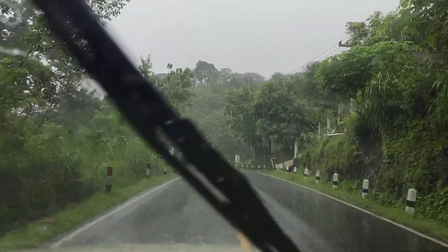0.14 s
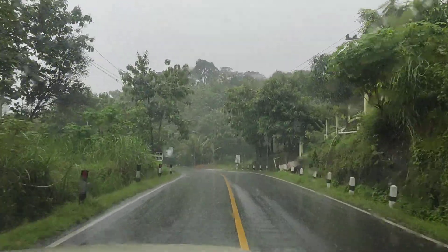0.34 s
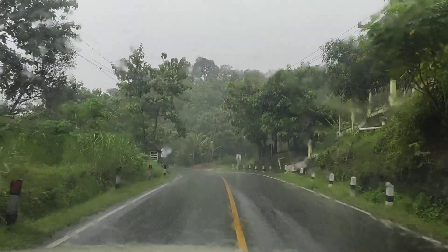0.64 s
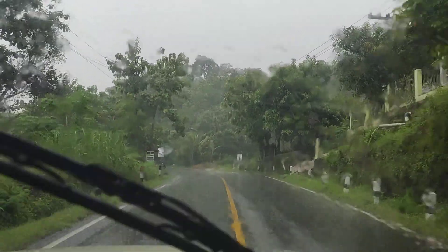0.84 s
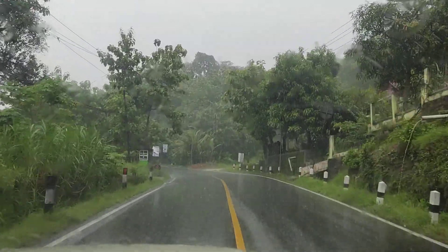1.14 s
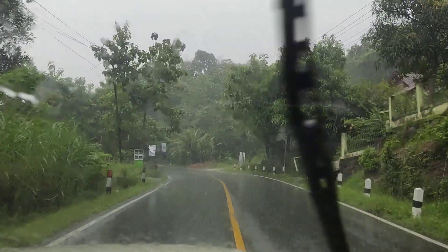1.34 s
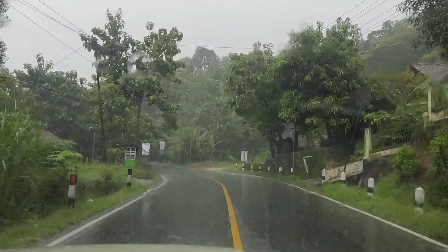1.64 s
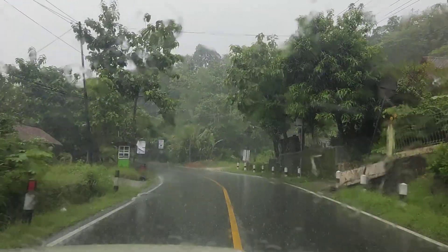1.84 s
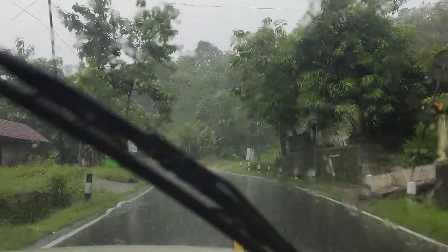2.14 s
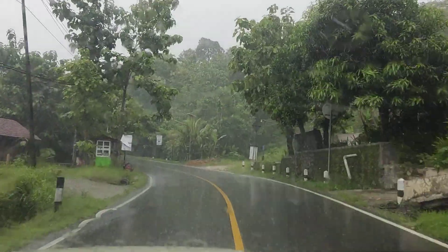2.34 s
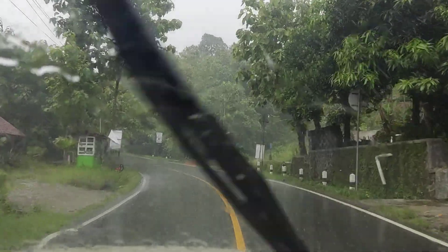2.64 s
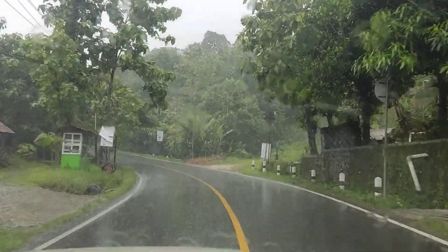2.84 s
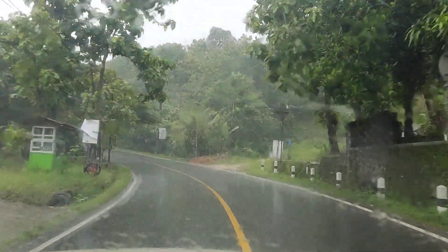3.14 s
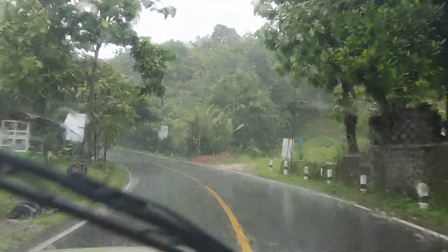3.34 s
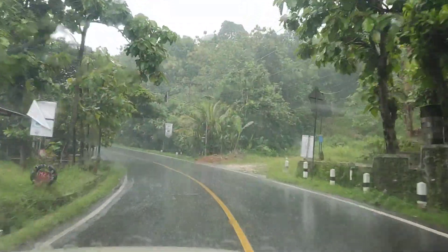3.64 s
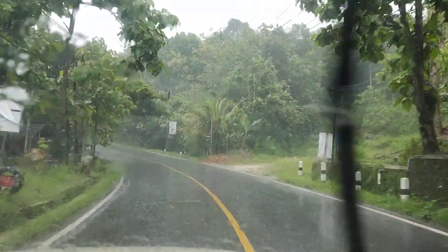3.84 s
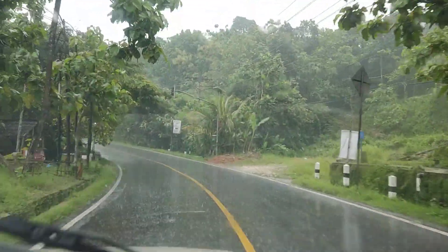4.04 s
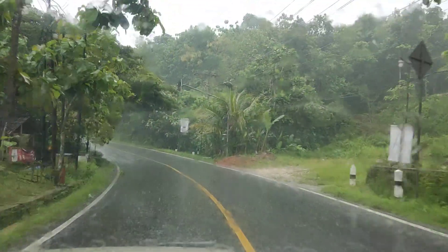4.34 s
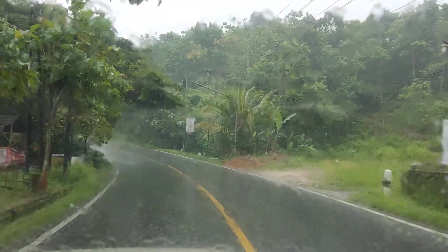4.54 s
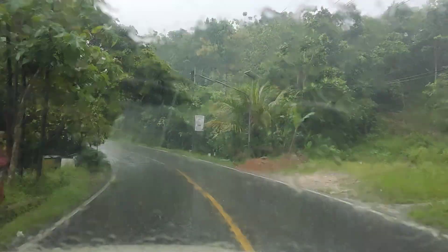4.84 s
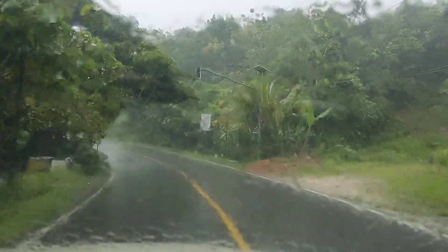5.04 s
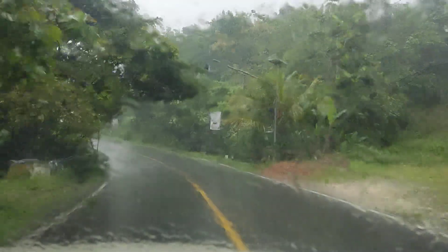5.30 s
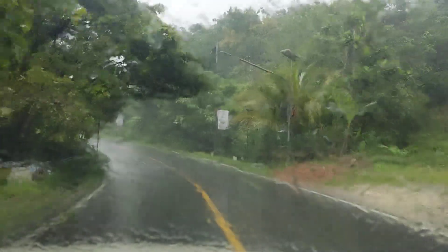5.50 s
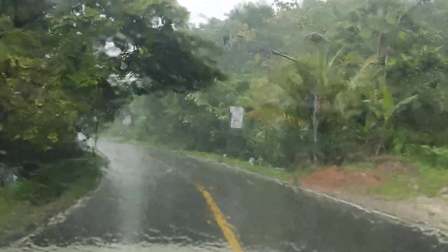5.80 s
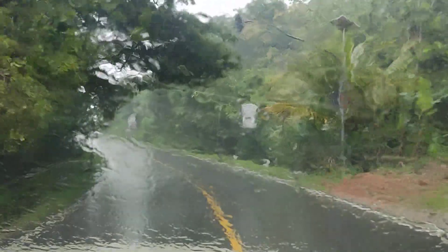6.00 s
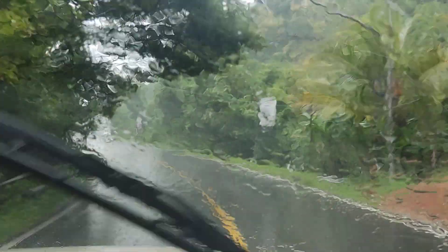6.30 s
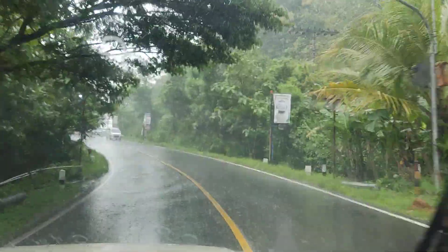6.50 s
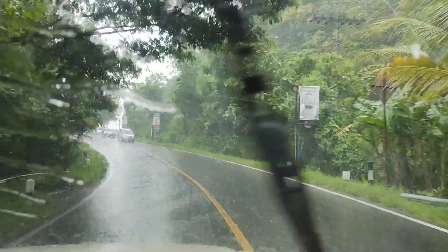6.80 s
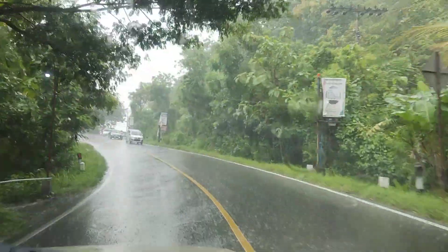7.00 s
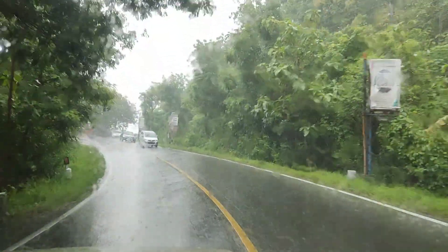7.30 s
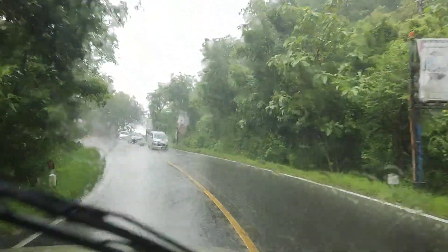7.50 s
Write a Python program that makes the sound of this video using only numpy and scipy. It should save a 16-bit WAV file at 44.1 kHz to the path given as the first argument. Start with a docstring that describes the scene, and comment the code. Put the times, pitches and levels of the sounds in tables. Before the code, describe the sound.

Inside a car driving through a downpour, drops smack the glass and roof while wet tyres hiss and the cabin rumbles.

```python
"""Heavy rain patters on the windscreen and drums on the lined roof of a moving car, heard from inside.
Each drop is a brief impact, coloured by the surface it strikes: bright on glass, dull through the lining.
Fat drops smack the glass, in flurries under the trees; drips knock on the roof and the wipers swish.
Below them the road drives the body into a boom, the wet tyres sizzle, the wheels throb
and the engine hums, speeding up a little at the end."""
import sys
import numpy as np
from scipy import signal
from scipy.fft import rfft, irfft, next_fast_len
from scipy.io import wavfile
from scipy.ndimage import uniform_filter1d, minimum_filter1d, map_coordinates

SR = 44100
rng = np.random.default_rng(int(sys.argv[2]) if len(sys.argv) > 2 else 0)


def inscribe(sig):
    """Save sig as 16-bit PCM at rate SR to the path in sys.argv[1].

    A 1-D sig is mono; a 2-D sig holds one channel per row.
    Samples are clipped to [-1, 1] before scaling.
    """
    pcm = np.round(np.clip(np.atleast_2d(sig).T, -1, 1) * 32767)
    wavfile.write(sys.argv[1], SR, pcm.astype(np.int16))


N = 337615
TIME = np.arange(N) / SR

# Roughness of the road. Each row: time in seconds, level of the boom in dB.
ROAD_ROUGHNESS = [(0, -16.5), (1.2, -15), (2, -16.5), (2.6, -17.5), (3.3, -16), (3.9, -17), (4.6, -16),
                  (5.5, -14.5), (6.5, -17), (7.66, -15)]
# Brief swells and dips of the low rumble. Each row: middle in seconds, change in dB.
RUMBLE_SWELLS = [(.43, -3), (.7, -5.5), (1.3, -4), (1.59, 3), (1.72, -2.5), (1.88, 3), (1.96, -6),
                 (2.4, -3), (2.53, -0.5), (2.67, -7), (2.81, 3), (3.31, -9), (3.41, -12), (3.72, -1.5),
                 (3.9, 5.5), (4.1, 4), (4.42, -4), (4.85, -9), (5.2, 1), (5.57, -4), (5.86, -4.5),
                 (6.31, -1), (7.55, 3.5)]
# Boom of the car body. Each row: frequency in Hz, relative level in dB.
BOOM_SPECTRUM = [(5, -34), (20, -7.5), (31, 0), (45, 3), (58, -2), (67, -20), (85, -12.5), (130, -13),
                 (155, -18.5), (182, -18), (215, -21), (255, -37), (400, -44), (900, -90)]
# Running of the engine. Each row: time in seconds, firing rate in Hz, load in dB.
ENGINE_STATE = [(0, 57.83, 1), (2, 57.96, 0.5), (3.3, 56.96, 0), (4.3, 58.11, -2), (5.5, 57.96, -5.5),
                (6.5, 58.6, 0), (7.1, 60.12, 2), (7.66, 60.9, 6)]
# Hum of the engine. Each row: multiple of the firing rate, level in dB, dB gained per dB of load.
ENGINE_ORDERS = [(1, -26, .3), (2, -30.7, .2), (3, -36, 1.25)]
# Wheels and gears. Each row: multiple of the firing rate, level in dB, dB gained per dB of load.
WHEEL_ORDERS = [(.353, -16, 0), (.706, -20, 0), (1.63, -34, 0.2), (3.66, -44.5, 0), (5.57, -46, 1.15)]
# Tyres and distant rain. Each row: frequency in Hz, relative level in dB.
WASH_SPECTRUM = [(100, -24), (250, -1), (330, -2.5), (600, -6), (850, -12), (1600, -8), (2400, -14.5),
                 (4000, -12.5), (7000, -19), (11000, -18.5), (14500, -25.5)]
# Upstrokes of the wipers. Each row: middle in seconds, level in dB.
WIPER_STROKES = [(.9, -41.5), (2.17, -44), (3.42, -48), (6.48, -46.5)]
# Strength of the rain. Each row: time in seconds, relative level in dB.
RAIN_STRENGTH = [(0.0, -34.5), (0.23, -37.5), (1.85, -36), (2.77, -37), (3.25, -39), (3.79, -37.5),
                 (4.71, -38), (5.2, -36), (5.54, -38.5), (6.54, -38), (7.16, -36.5), (7.31, -37),
                 (7.66, -36.5)]
# Modes of the roof panel and cabin. Each row: frequency in Hz, width in Hz, gain in dB.
PANEL_MODES = [(280.7, 5.4, 5.5), (332, 5.6, 0.5), (470, 21, 2), (550, 21, 0.5), (621, 32, 4.5),
               (1010, 52, 7), (1400, 80, 2.5)]
# Drops heard through the roof lining. Each row: frequency in Hz, gain in dB.
ROOF_RESPONSE = [(80, -32), (200, -6), (350, 6), (550, 1.5), (850, -21), (1500, -8), (2500, -14.5),
                 (5000, -54), (12000, -65)]
# Gusts that throw water on the roof. Each row: middle in seconds, swell in dB.
ROOF_GUSTS = [(.03, 5), (.56, 4), (1.84, 3), (2.52, 1.5), (3.1, 4.5), (3.69, 0.5), (4.36, 2.5), (5.39, 2),
              (7.3, 7.5), (7.59, 3.5)]
# Showers shed by branches. Each row: middle in seconds, half length in seconds, level in dB.
BRANCH_SHOWERS = [(5.249, 0.015, -31.5), (5.398, 0.051, -34.5), (5.89, 0.024, -34), (7.183, 0.031, -30.5),
                  (7.33, 0.024, -31.5), (7.601, 0.068, -31.5)]
# Colour of those showers. Each row: frequency in Hz, gain in dB.
SHOWER_RESPONSE = [(150, -10), (450, -4), (1300, 4.5), (2600, 0), (4500, -2.5), (8000, -13), (14000, -32)]
# Heavy drips on the roof. Each row: start in seconds, relative level in dB, main mode in Hz,
# its width in Hz, upper mode against main in dB, thud against ring in dB.
ROOF_DRIPS = [(4.2, -16.5, 1290, 130, -13, -6), (5.242, -18.5, 2000, 900, -1, -8),
              (5.3462, -13.5, 2600, 450, -3, -5), (5.351, -20, 1450, 700, -3, -3),
              (5.398, -16, 500, 280, -10, -7), (7.146, -20, 680, 350, -4, -4),
              (7.2575, -13.5, 2450, 800, -1, -11), (7.31, -16, 560, 600, -3, -4),
              (7.327, -20, 700, 600, -3, -3), (7.347, -22, 3000, 600, -2, -2),
              (7.3725, -20.5, 3500, 1200, 1, -8), (7.608, -21, 3000, 1000, -3, -3),
              (7.625, -21, 1700, 1200, -1, -3)]
# Drops heard through the glass. Each row: frequency in Hz, gain in dB.
GLASS_RESPONSE = [(200, -11), (700, 4), (1400, -2.5), (2400, 0), (3800, 1.16), (6000, -0.7), (9000, -3.5),
                  (11500, -3), (13000, -9.5), (14500, -7)]
# Spray sweeping over the glass. Each row: middle in seconds, half length in seconds, swell in dB.
SPRAY_SHEETS = [(0.057, 0.044, 0.5), (0.278, 0.029, 5), (0.78, 0.035, 3), (0.97, 0.076, 1),
                (1.73, 0.029, 1.5)]
# Brief lulls in the patter on the glass. Each row: middle in seconds, dip in dB.
PATTER_LULLS = [(3.93, -3), (6.87, -4), (7.28, -3), (7.435, -7.5), (7.484, -4), (7.56, -3.5)]
# The fattest drops on the glass. Each row: start in seconds, relative level in dB, treble lift in dB,
# left against right in dB, spray against impact in dB.
FAT_DROPS = [(.4377, -23, 0, -3, -3), (.4447, -19, 5, 2, 2), (.484, -24, 2, 0, -2), (.537, -20.5, 0, 2, 4),
             (.7673, -23, 0, -2, 4), (.8347, -19, 6, 7, -1), (.9818, -27, -7, 4, -2),
             (1.0472, -19, 6, -6, 2), (1.649, -23, 2, 0, -2), (1.7022, -22, 3, -5, -2),
             (1.9772, -18.5, 10, -10, -5), (1.9849, -23.5, 4, -3, -3), (2.104, -17, 6, 3, 1),
             (2.3747, -23.5, 2, 0, -2), (2.5305, -16.5, 0, -5, 2), (2.5427, -20, 0, -2, -1),
             (2.6354, -25, -1, 0, -2), (3.2547, -25, 2, 0, -2), (3.2677, -22, 0, -3, 5),
             (3.3438, -25, 2, 3, -2), (3.39, -24.5, 2, -3, -2), (3.4167, -25, 2, 2, -2),
             (3.7383, -22.5, 5, 3, -1), (4.0738, -22, 4, -7, 5), (4.189, -21.5, 15, 4, 6),
             (4.1943, -17, 16, 5, 9), (4.252, -16.5, 3, 2, 1), (4.4228, -19.5, -9, -1, 2),
             (4.6467, -24.5, 2, 0, -2), (4.7111, -25, 7, -5, 4), (4.7499, -21, 0, -5, 0),
             (4.999, -22, 7, 3, -1), (5.2309, -22, -4, -8, 0), (5.349, -18.5, -8, -8, -1),
             (5.4918, -20.5, -3, -4, 2), (5.6412, -24.5, 0, 0, -2), (5.8074, -25, 2, 5, -3),
             (6.1053, -24, 2, -8, 0), (6.2301, -25, 2, 0, -2), (6.3312, -17.5, 0, -3, 3),
             (6.4483, -22, 1, 11, -4), (6.6216, -23, 3, -7, -3), (6.6357, -22, 0, 0, 0),
             (6.7297, -17, -6, 3, 3), (6.7397, -25, 0, -5, -3), (6.8215, -24.5, 2, 0, -2),
             (6.941, -22.5, 0, 5, 2), (6.9722, -22.5, 13, 10, -3), (7.0114, -21, -4, -5, -4),
             (7.0296, -24, 2, 0, -2), (7.2345, -12.5, -4, 0, 5), (7.3474, -19.5, 2, 2, -1),
             (7.3957, -24.5, 2, -3, -2), (7.4707, -16, -7, -5, 2), (7.497, -14.5, -8, -4, 2),
             (7.5125, -25, -3, -5, 2), (7.526, -17, -3, -5, 1), (7.5305, -15, -2, -3, 10),
             (7.5761, -24, -4, -4, 2), (7.597, -16.5, -2, -1, 9)]
# Burst of a fat drop on the glass. Each row: frequency in Hz, gain in dB.
BURST_RESPONSE = [(200, -20), (700, -2), (1400, -4), (2400, -3), (3800, 1.5), (6000, 3), (9000, 3),
                  (11500, 3), (13000, -4.5), (14500, -4)]
# Resonance of the microphone ports, left then right. Each row: frequency in Hz, width in Hz, gain in dB.
PORT_MODES = [(11460, 3700, 6), (9030, 1760, 11)]
# Broad response of the ports. Each row: frequency in Hz, left gain in dB, right gain in dB.
PORT_RESPONSE = [(60, 0.83, 2), (171, 2.4, 1), (322, 2.5, 1.35), (400, 1, -2), (747, 2, 1.5), (980, -2, -3),
                 (2800, -2.5, -2), (6000, -4.5, -2.5), (8670, -4.5, 1), (10700, 0, -6.5),
                 (14000, -5.5, -7.5)]


def amp(db):
    """Amplitude grows tenfold for every 20 dB."""
    return 10 ** (np.asarray(db) / 20)


def unit(x):
    """Normalisation to rms 1."""
    return x / np.sqrt(np.mean(x ** 2) + 1e-20)


def curve(rows):
    """Linear interpolation of each column of a time table, at every sample."""
    s, *columns = np.transpose(rows)
    return [np.interp(TIME, s, c) for c in columns]


def spectrum(rows, hz):
    """Interpolation of each column of a frequency table, on a logarithmic axis."""
    f, *columns = np.transpose(rows)
    return np.array([np.interp(np.log(hz + 1), np.log(f + 1), c) for c in columns])


def resonance_db(modes, hz):
    """Each resonance adds a bell-shaped curve to the response in dB."""
    return sum(db / (1 + (2 * (hz - f) / width) ** 2) for f, width, db in modes)


def colour(x, shape):
    """Filtering multiplies the spectrum by a response, here a function from Hz to dB."""
    size = next_fast_len(x.shape[-1])
    gain = amp(shape(np.fft.rfftfreq(size, 1 / SR)))
    return irfft(rfft(x, size) * gain, size)[..., :x.shape[-1]]


def resonate(x, hz, width_hz):
    """A damped mode rings the longer the narrower it is; the result has energy 1."""
    r = np.exp(-np.pi * width_hz / SR)
    ring = signal.lfilter([1, 0, -1], [1, -2 * r * np.cos(2 * np.pi * hz / SR), r * r], x)
    return ring / np.linalg.norm(ring)


def mingle(x, corner_hz=330):
    """Coherence falls with frequency: long waves reach both microphone ports alike, short ones differ."""
    return x + colour(x[::-1], lambda hz: -20 * np.log10(1 + (hz / corner_hz) ** 2))


def drift(per_s):
    """Slow random modulation of rms 1, a spline through random knots."""
    knots = rng.standard_normal(4096)
    return unit(map_coordinates(knots, [TIME[::64] * per_s], order=3, mode="wrap")).repeat(64)[:N]


def swell(s, half_s):
    """A Gaussian envelope of height 1; the half length is its standard deviation."""
    return np.exp(-.5 * ((TIME - s) / half_s) ** 2)


def add(mix, s, sound):
    """Superposition: a stereo sound adds to the mix from second s."""
    part = mix[:, max(round(s * SR), 0):][:, :sound.shape[1]]
    part += sound[:, :part.shape[1]]


def splash(spray_s, spray_db, cabin_db, cabin_t60=0.15):
    """A drop is three decaying transients: the impact, flung droplets, the cabin's reverberation."""
    t = np.arange(4096) / SR
    impact, spray, tail = rng.standard_normal((3, 2, len(t)))
    since_arrival = t - rng.integers(0, 24, (2, 1)) / SR  # the path to each port differs
    impact = impact * (since_arrival >= 0) * np.exp(-abs(since_arrival) / 0.00024)
    spray = spray * rng.exponential(1, spray.shape) * np.exp(-t / spray_s)
    tail = tail * amp(-60 * t / cabin_t60)
    return unit(unit(impact) + amp(spray_db) * unit(spray) + amp(cabin_db) * unit(tail)) / np.sqrt(len(t))


def patter(per_s, spread_db, spray_s, spray_db, cabin_db, tint_db, side_db, spots=20):
    """Shot noise: drops of random size and timing excite spots, each with its own colour and side."""
    out = np.zeros((2, N))
    sides = rng.permutation(np.linspace(-1, 1, spots))
    for side, ring_hz in zip(sides, np.geomspace(1000, 13000, spots)):
        sizes = amp(spread_db * np.minimum(rng.exponential(1, N), 4.5))
        hits = sizes * (rng.random(N) < per_s / spots / SR)
        drop = splash(spray_s, spray_db, cabin_db)
        drop = colour(drop, lambda hz: resonance_db([(ring_hz, 0.61 * ring_hz, tint_db)], hz))
        pan = amp([[side * side_db], [-side * side_db]])
        out += signal.oaconvolve(hits[None], unit(drop) * pan, axes=1)[:, :N]
    return unit(out)


def body_boom():
    """Forced vibration: the road shakes the cabin, and such long waves reach both ports nearly alike."""
    noise = rng.standard_normal(N) + 0.1 * rng.standard_normal((2, N))
    bumps_db = 0.2 * drift(per_s=9.9)
    boom = unit(colour(noise, lambda hz: spectrum(BOOM_SPECTRUM, hz)))
    return amp(curve(ROAD_ROUGHNESS)[0] + bumps_db) * boom


def drivetrain(orders, waver_db, wobble_turns, roughness):
    """Rotating parts sound at multiples of the firing rate, swell with load and shudder with the road."""
    firing_hz, load_db = curve(ENGINE_STATE)
    turns = np.cumsum(firing_hz) / SR
    out = np.zeros(N)
    for multiple, db, load_share in orders:
        phase = multiple * turns + rng.random() + wobble_turns * drift(per_s=4)
        shudder = unit(1 + roughness * drift(per_s=30))
        level = amp(db + load_share * load_db + waver_db * drift(per_s=5.5))
        out += np.sqrt(2) * level * shudder * np.sin(2 * np.pi * phase)
    return out


def wet_wash():
    """Broadband noise of wet tyres and distant rain, filtered by the modes of panel and cabin."""
    noise = mingle(rng.standard_normal((2, N)))
    sizzle = colour(noise, lambda hz: spectrum(WASH_SPECTRUM, hz) + resonance_db(PANEL_MODES, hz))
    rain_db = curve(RAIN_STRENGTH)[0]
    return amp(-35.5 + 0.25 * (rain_db - rain_db.mean()) + 0.27 * drift(per_s=5.1)) * unit(sizzle)


def wipers(centre_hz=3880, width_hz=1400):
    """Rubber blades push a film of water up the glass; the swish is noise through two resonators."""
    strokes = sum(amp(db) * swell(s, half_s=.12) for s, db in WIPER_STROKES)
    film = resonate(rng.standard_normal((2, N)), centre_hz, width_hz)
    return strokes * unit(resonate(film, centre_hz, width_hz))


def roof_drumming():
    """Impacts excite the panel's modes and the lining absorbs the treble; gusts swell the drumming."""
    drops = mingle(patter(per_s=700, spread_db=3, spray_s=0.007, spray_db=4,
                          cabin_db=0, tint_db=5.5, side_db=1))
    drumming = colour(drops, lambda hz: spectrum(ROOF_RESPONSE, hz) + resonance_db(PANEL_MODES, hz))
    rain_db = curve(RAIN_STRENGTH)[0]
    gust_db = sum(db * swell(s, half_s=0.086) for s, db in ROOF_GUSTS)
    flurry_db = -0.14 * drift(per_s=10)
    return amp(-37.5 + 0.46 * (rain_db - rain_db.mean()) + gust_db + flurry_db) * unit(drumming)


def branch_showers():
    """Bursts of shot noise: clumps of big drops from the branches rattle on the sheet metal."""
    strength = sum(amp(db) * swell(s, half_s) for s, half_s, db in BRANCH_SHOWERS)
    drops = patter(per_s=980, spread_db=4, spray_s=0.0032, spray_db=-7,
                   cabin_db=-10, tint_db=-6, side_db=-0.5)
    return strength * unit(colour(drops, lambda hz: spectrum(SHOWER_RESPONSE, hz)))


def roof_knocks(upper_ratio=1.62, lining_hz=5200, thud_hz=524, thud_width_hz=780):
    """Struck sheet metal rings in two modes, low-passed by the lining, while the whole panel thuds."""
    out = np.zeros((2, N))
    for s, db, ring_hz, width_hz, upper_db, thud_db in ROOF_DRIPS:
        blow = splash(spray_s=5 / ring_hz, spray_db=2, cabin_db=-9)  # low knocks last longer
        main = resonate(blow, ring_hz, width_hz)
        upper = amp(upper_db) * resonate(blow, upper_ratio * ring_hz, width_hz)
        ring = colour(main + upper, lambda hz: -10 * np.log10(1 + (hz / lining_hz) ** 6))
        thud = splash(spray_s=0.0083, spray_db=8, cabin_db=-4)
        thud = colour(thud, lambda hz: resonance_db([(thud_hz, thud_width_hz, 40)], hz))
        knock = ring / np.linalg.norm(ring) + amp(thud_db) * thud / np.linalg.norm(thud)
        add(out, s, knock * amp(db + 19))
    return out


def windscreen_patter(clump_decay_s=0.012):
    """Dense impacts all over the glass merge into a bright patter; sparse near ones stay crisp ticks."""
    far = patter(per_s=1800, spread_db=3, spray_s=0.0045, spray_db=2.5,
                 cabin_db=5.5, tint_db=10.5, side_db=2)
    near = patter(per_s=130, spread_db=1.6, spray_s=.004, spray_db=2, cabin_db=-8, tint_db=5, side_db=3)
    glass = unit(colour(far + amp(-4.5) * near, lambda hz: spectrum(GLASS_RESPONSE, hz)))
    # each fat drop scatters a clump of small ones, the more the fatter it is
    clumps = [amp(db + 19) * (TIME > s) * np.exp(-abs(TIME - s) / clump_decay_s)
              for s, db, *_ in FAT_DROPS]
    clump_db = 3.5 * np.max(clumps, axis=0)
    sheet_db = sum(db * swell(s, half_s) for s, half_s, db in SPRAY_SHEETS)
    lull_db = sum(db * swell(s, half_s=0.025) for s, db in PATTER_LULLS)
    flurry_db = 0.78 * drift(per_s=13)
    return amp(3.5 + curve(RAIN_STRENGTH)[0] + flurry_db + clump_db + sheet_db + lull_db) * glass


def stray_drops(per_s=7, bright_db=1, spray_db=-2):
    """Random arrivals: lesser fat drops at chance moments and places, as rows like FAT_DROPS."""
    chance = rng.uniform(-1.1, 1, (round(per_s * N / SR), 3))
    return [(abs(when) * N / SR, -28 + 1.5 * size, bright_db, 9 * side, spray_db)
            for when, size, side in chance]


def windscreen_smacks():
    """A brief impact has a broad spectrum: fat drops burst on the glass, from dry ticks to wet splats."""
    out = np.zeros((2, N))
    for s, db, bright_db, pan_db, spray_db in FAT_DROPS + stray_drops():
        drop = splash(spray_s=.0035, spray_db=spray_db, cabin_db=-9)
        drop = colour(drop, lambda hz: spectrum(BURST_RESPONSE, hz) + bright_db * np.minimum(hz / 9000, 1))
        drop /= np.linalg.norm(drop, axis=1, keepdims=True)
        sides_db = np.array([[pan_db], [-pan_db]]) / 2
        add(out, s, drop * amp(db + 14 + sides_db))
    return out


def scene():
    """Sound pressures add: rain and wipers lie over the noise of driving."""
    rumble_gain = amp(sum(db * swell(s, half_s=.028) for s, db in RUMBLE_SWELLS))
    boom = rumble_gain * body_boom()
    engine = drivetrain(ENGINE_ORDERS, waver_db=1, wobble_turns=0.048, roughness=.55)
    wheels = rumble_gain * drivetrain(WHEEL_ORDERS, waver_db=1.6, wobble_turns=0.08, roughness=0.25)
    background = boom + engine + wheels + wet_wash()
    rain = roof_drumming() + windscreen_patter() + branch_showers() + windscreen_smacks() + roof_knocks()
    return background + rain + wipers()


def limiter(x, ceiling=.9):
    """Peak limiting: the gain falls smoothly around the highest peaks."""
    peak = abs(x).max(0) + 1e-9
    gain = (1 + (peak / ceiling) ** 6) ** (-1 / 6)
    return x * uniform_filter1d(minimum_filter1d(gain, size=600), size=600)


def record(dry, cutoff_hz=14330):
    """Each microphone port resonates in the treble; a limiter and a low-pass filter follow."""
    heard = colour(dry, lambda hz: spectrum(PORT_RESPONSE, hz)
                   + np.array([resonance_db([port], hz) for port in PORT_MODES]))
    low_pass = signal.firwin(511, cutoff_hz, window=("kaiser", 9), fs=SR)
    return signal.oaconvolve(limiter(heard), low_pass[None], "same")


dry = scene()
out = record(dry)
inscribe(out)
```